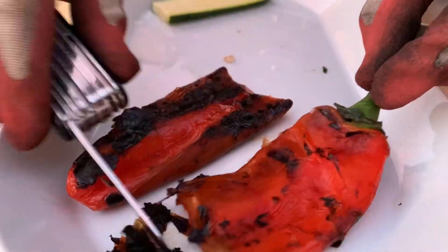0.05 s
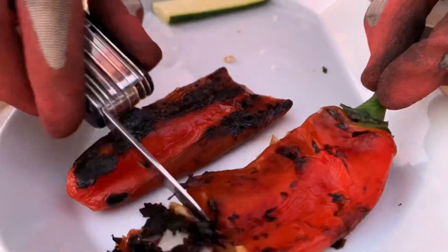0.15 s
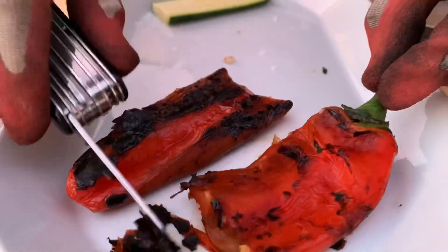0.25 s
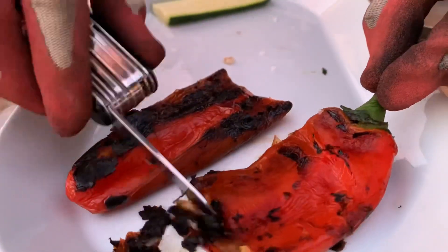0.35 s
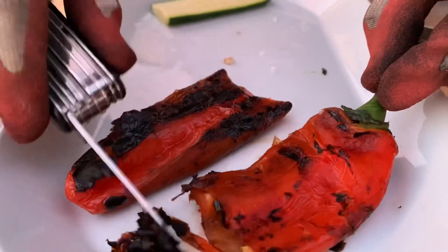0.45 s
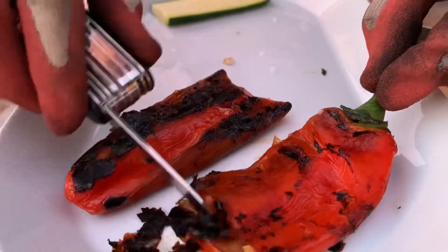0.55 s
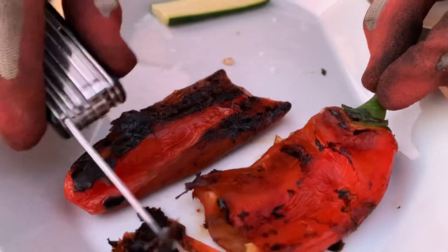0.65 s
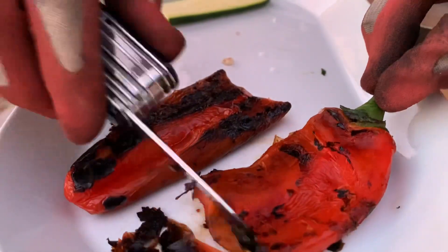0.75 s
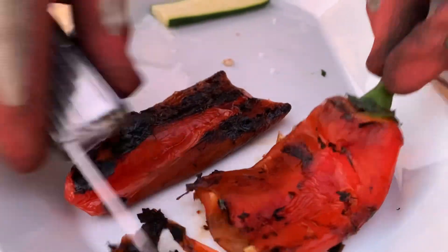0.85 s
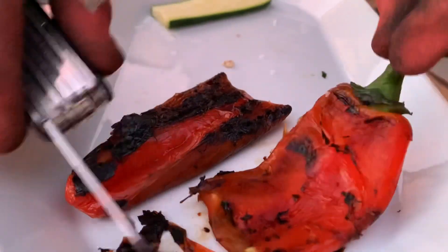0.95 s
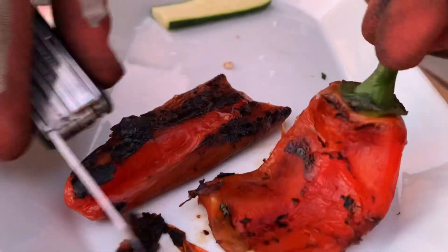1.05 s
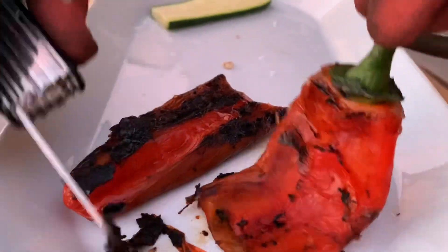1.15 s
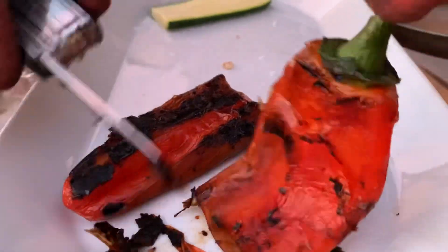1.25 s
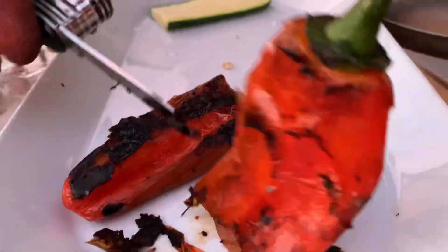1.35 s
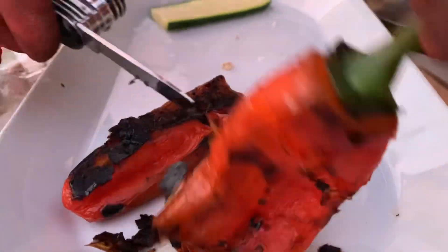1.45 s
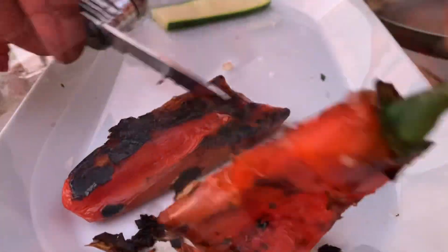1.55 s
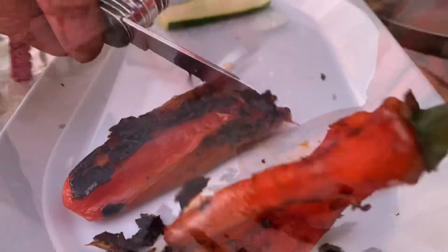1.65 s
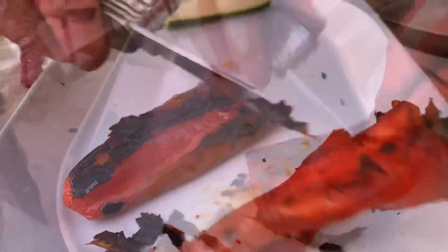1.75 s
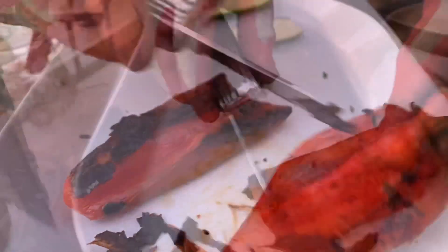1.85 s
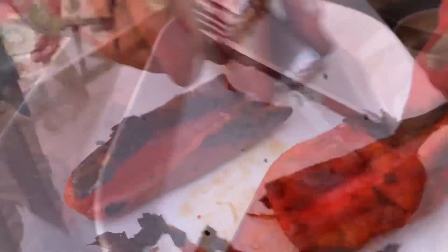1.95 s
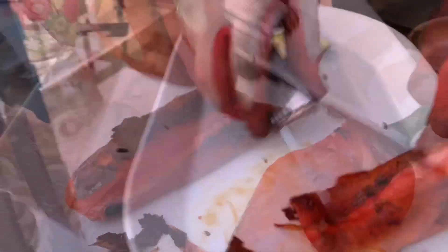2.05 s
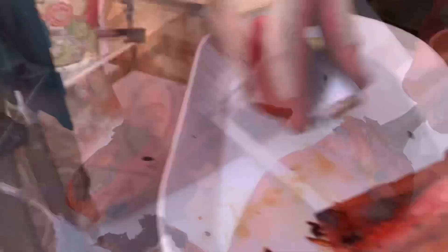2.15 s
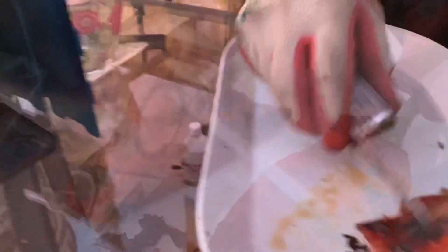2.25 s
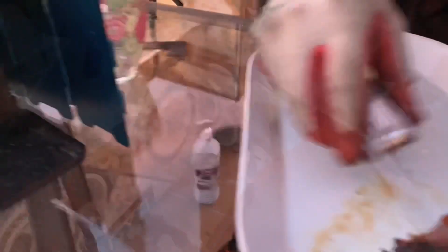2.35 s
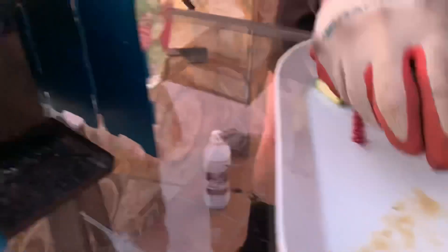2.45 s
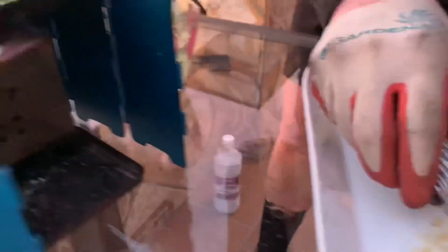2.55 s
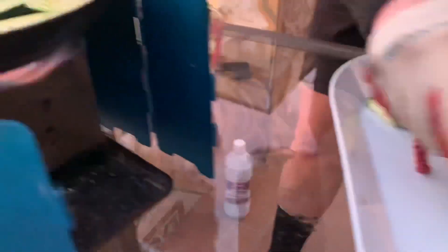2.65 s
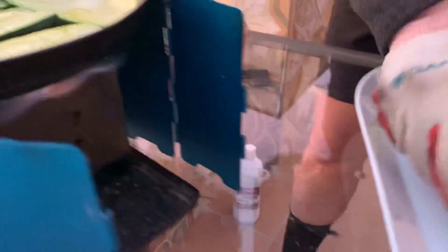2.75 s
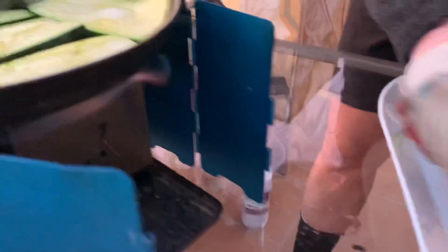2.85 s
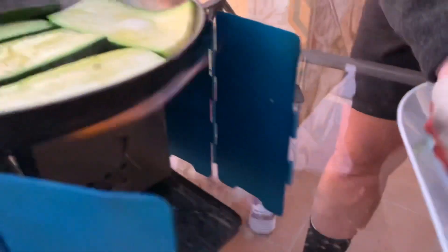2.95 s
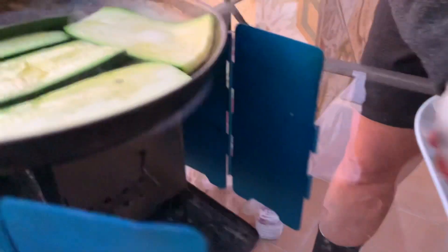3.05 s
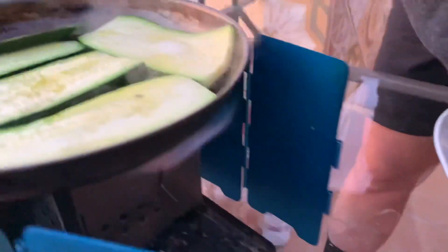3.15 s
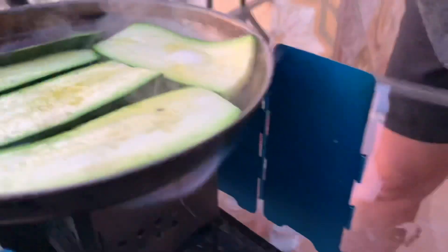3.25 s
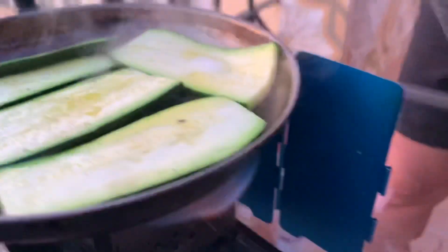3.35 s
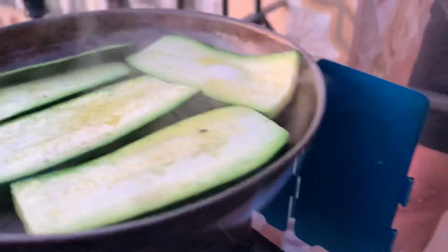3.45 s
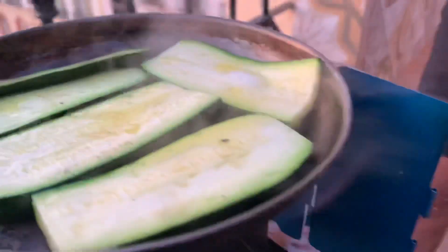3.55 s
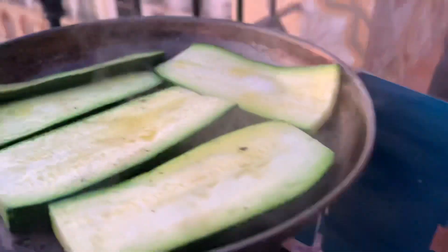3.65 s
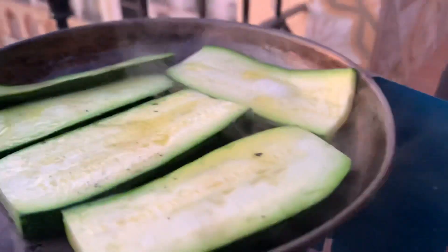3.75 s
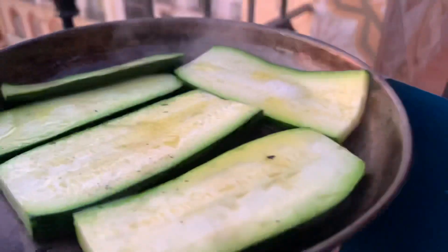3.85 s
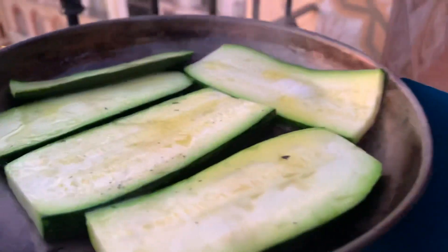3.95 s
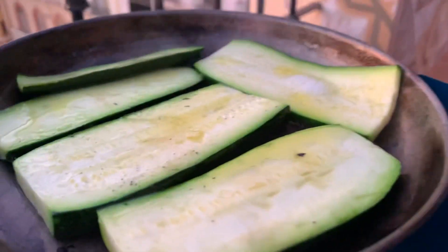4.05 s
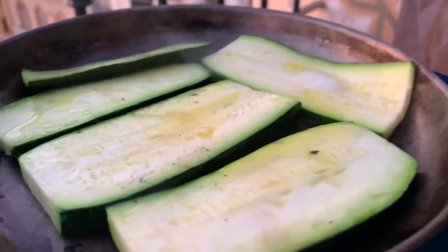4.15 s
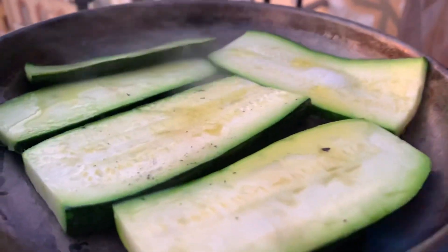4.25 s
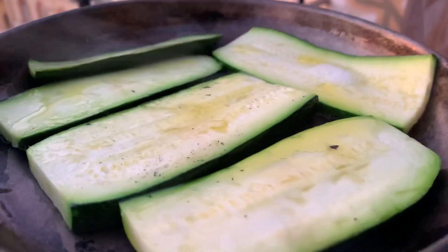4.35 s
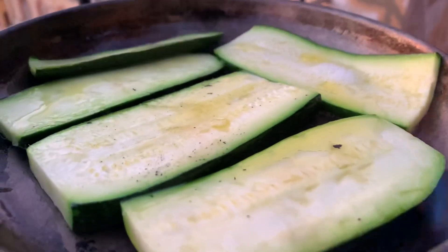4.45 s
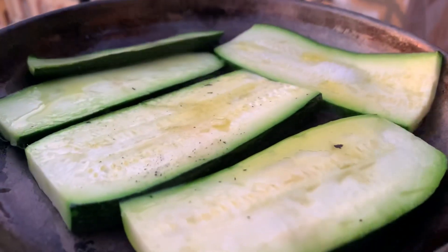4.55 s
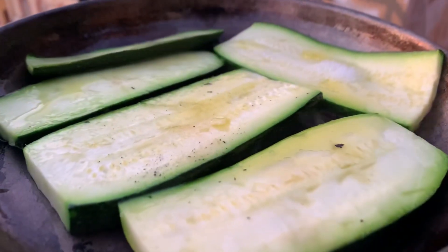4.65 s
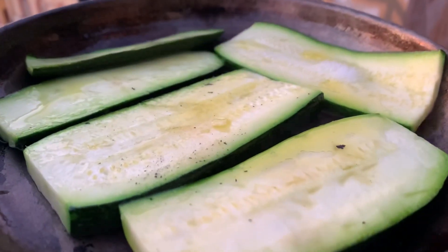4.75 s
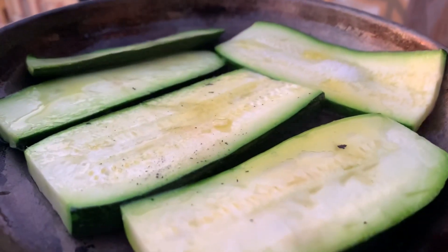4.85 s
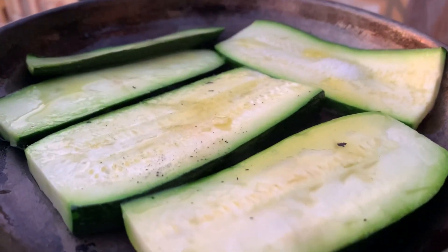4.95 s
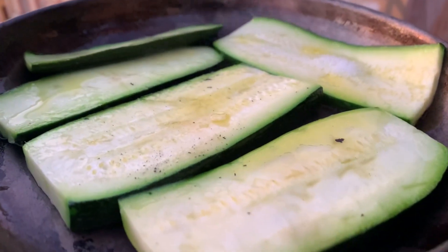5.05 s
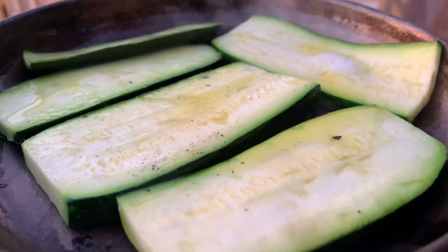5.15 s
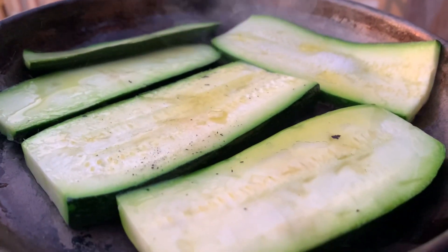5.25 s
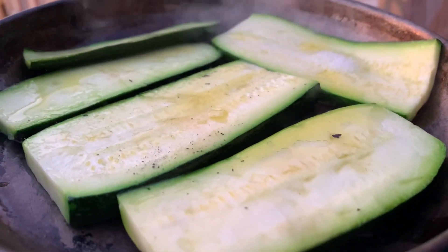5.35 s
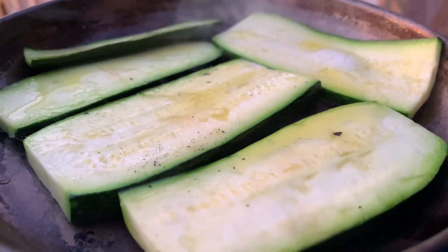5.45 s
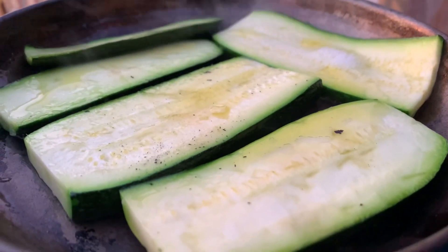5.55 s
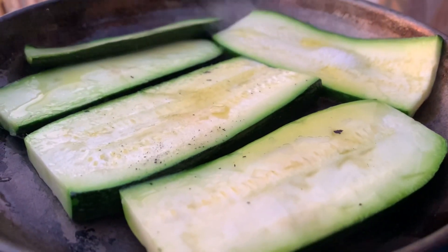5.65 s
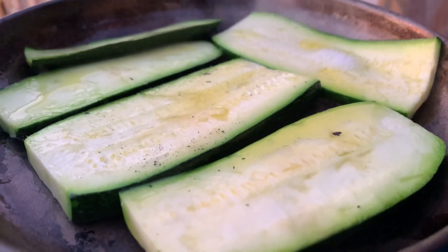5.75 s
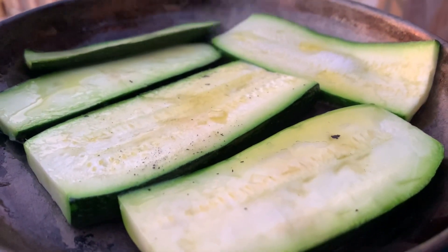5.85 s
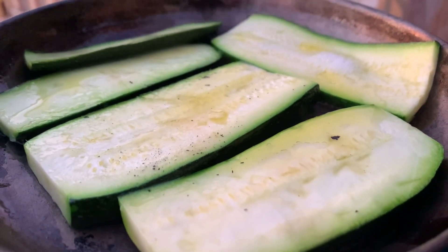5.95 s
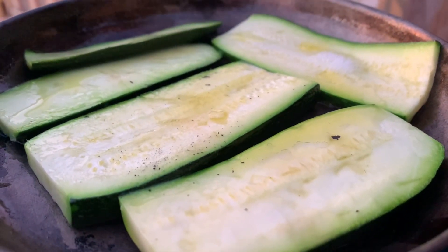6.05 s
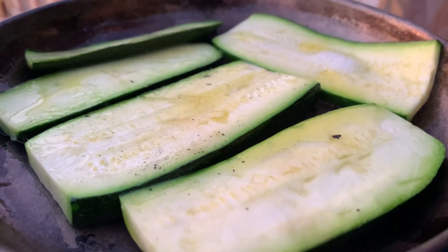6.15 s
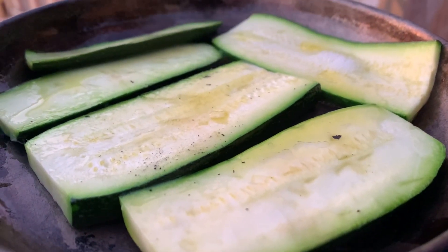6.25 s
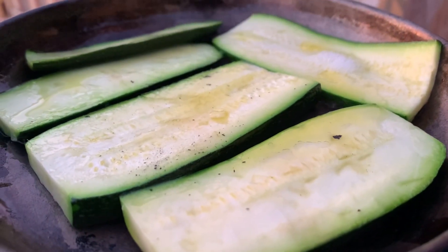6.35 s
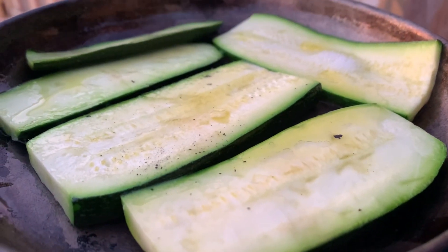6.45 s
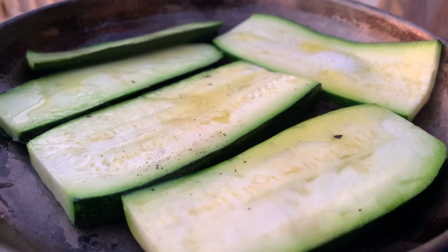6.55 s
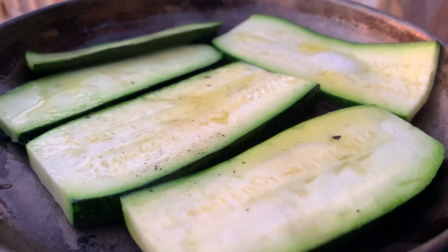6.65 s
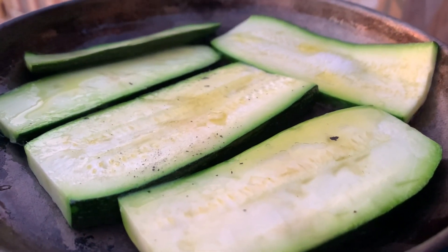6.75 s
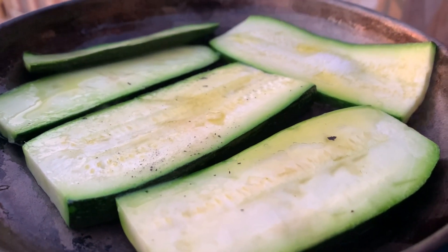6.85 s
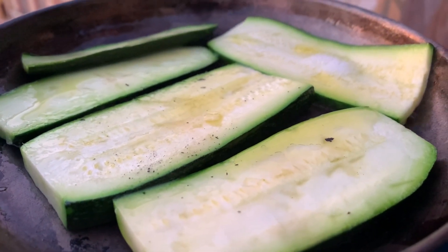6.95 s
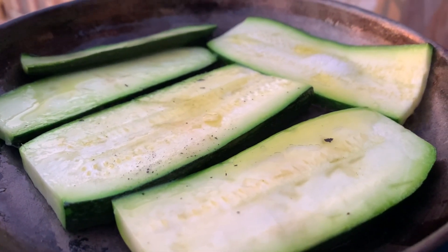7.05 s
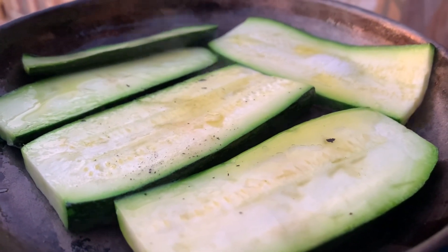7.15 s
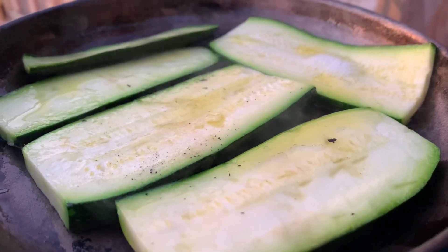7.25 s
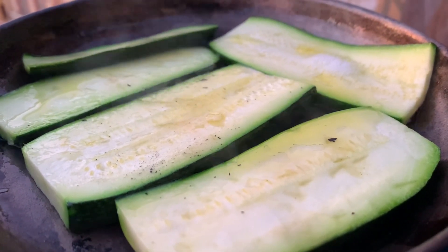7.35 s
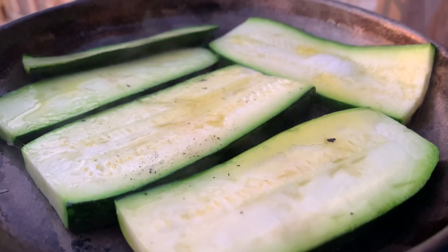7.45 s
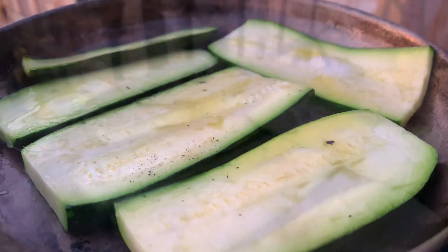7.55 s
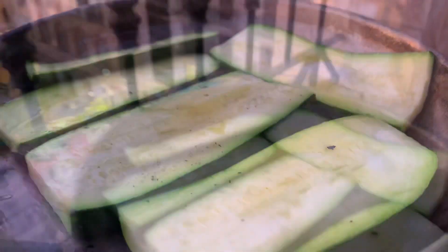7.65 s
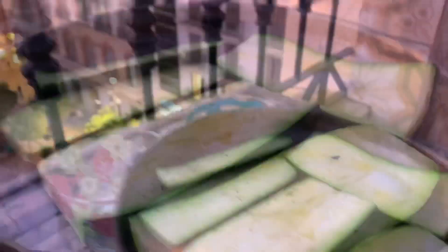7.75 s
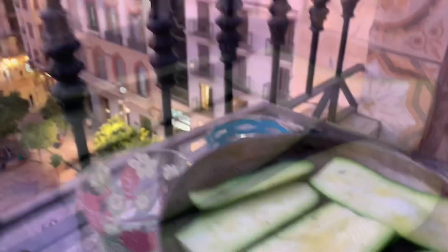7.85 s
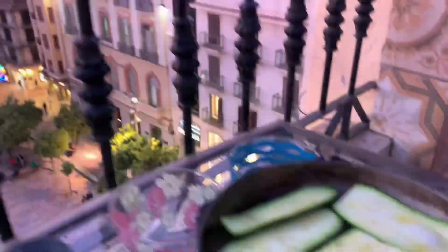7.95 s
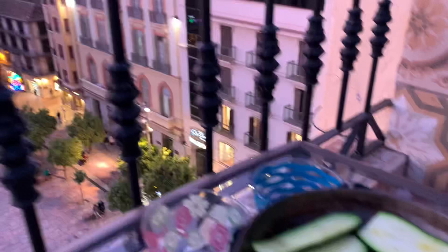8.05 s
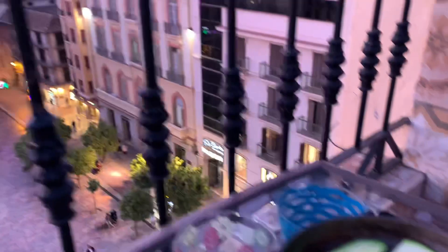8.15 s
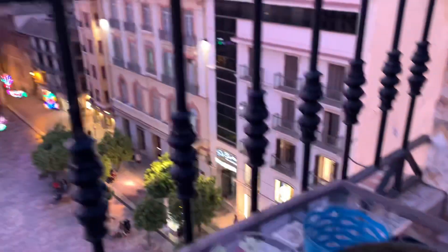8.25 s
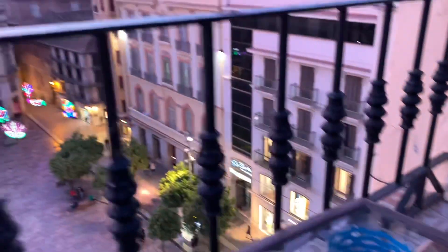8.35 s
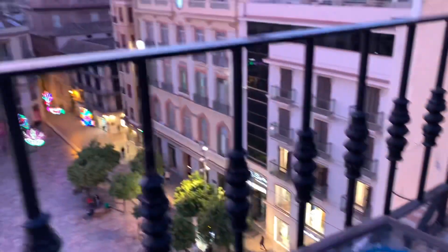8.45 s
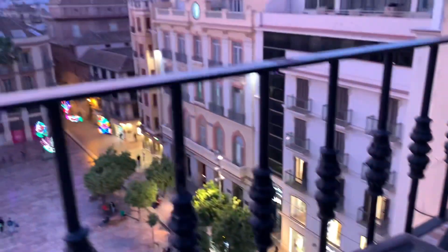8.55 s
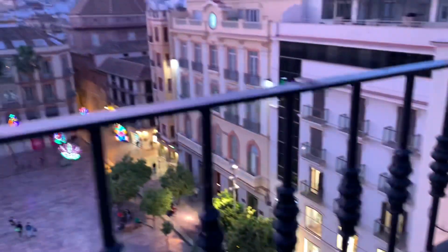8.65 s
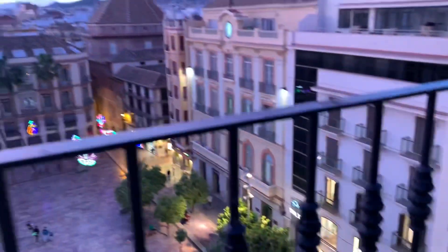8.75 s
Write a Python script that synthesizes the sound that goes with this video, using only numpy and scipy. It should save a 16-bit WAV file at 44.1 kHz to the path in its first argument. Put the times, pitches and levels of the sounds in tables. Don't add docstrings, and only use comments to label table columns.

```python
import sys
import numpy as np
from scipy import signal
from scipy.fft import rfft, irfft, next_fast_len
from scipy.io import wavfile
from scipy.ndimage import uniform_filter1d

SR = 44100
rng = np.random.default_rng(int(sys.argv[2]) if len(sys.argv) > 2 else 0)


def gain_from_decibels(decibels):
    exponent = np.asarray(decibels, float) / 20
    return 10 ** exponent


def unload_wav(signal):
    wavfile.write(
        sys.argv[1],
        SR,
        np.round(np.clip(np.atleast_2d(signal).T, -1, 1) * 32767).astype(np.int16),
    )


N = 388521

# time in seconds, lag of the right microphone in samples,
# spread of that lag over the pan in samples.
AIM = [
    (0, 21.5, 1.2),
    (2.3, 21, 1.4),
    (3, 16.5, 2.5),
    (7.5, 16.5, 2.5),
    (8.1, 3, 5),
    (8.81, -3, 4),
]


def evened(x):
    return x / np.sqrt(np.mean(x ** 2) + 1e-20)


def read(points, hz):
    f, value = np.transpose(points)
    return np.interp(np.log(hz + 1), np.log(f + 1), value)


def curve(table, count, t):
    return np.interp(t, np.array(table)[:, 0], np.array(table)[:, count])


def add(mix, s, sound):
    part = mix[max(round(s * SR), 0):][:len(sound)]
    part += sound[:len(part)]


def colour(x, points):
    size = next_fast_len(N)
    gain = gain_from_decibels(read(points, np.fft.rfftfreq(size, 1 / SR)))
    return irfft(rfft(x, size) * gain, size)[..., :N]


def wash(points, patchy_db, swell_db, sideways):
    # frequency in Hz, left-right likeness from 0 to 1.
    likeness = [(60, 0.91), (200, 0.95), (500, 0.75), (1000, 0.33)]
    frames, hz = N // 256 + 5, np.fft.rfftfreq(1024, 1 / SR)
    a, b, c, d, patches = rng.standard_normal((frames, 513, 5)).T
    swell = evened(uniform_filter1d(patches[0], 20))
    patches = evened(uniform_filter1d(uniform_filter1d(patches, 5, 0), 14, 1))
    same = np.clip(read(likeness, hz), 0, 1)[:, None]
    lag_s = sideways * curve(AIM, count=1, t=np.arange(frames) * 256 / SR) / SR
    left = a + 1j * b
    left_late = left * np.exp(-2j * np.pi * hz[:, None] * lag_s)
    z = np.array([left, same * left_late + np.sqrt(1 - same ** 2) * (c + 1j * d)])
    z *= gain_from_decibels(patchy_db * patches + swell_db * swell)
    noise = signal.istft(z, nperseg=1024, noverlap=768)[1][:, :N]
    return evened(colour(noise, points))


def street(t):
    # frequency in Hz, level in dB.
    hum = [(12, -48), (20, -90), (48, -0.5), (92, -1), (163, -1), (339, -8.5), (420, -5.5), (770, -15),
           (835, -21), (1000, -23.5), (1300, -65), (2200, -120)]
    # time in seconds, level in dB.
    traffic = [(0.0, -40.5), (0.17, -39), (0.39, -40), (1.57, -39.5), (2.03, -44.5), (2.26, -42.5),
               (2.43, -40.5), (3.88, -38), (4.49, -41), (5.18, -41), (5.4, -43.5), (5.89, -42),
               (6.33, -43.5), (7.41, -42), (7.88, -48), (8.0, -46), (8.19, -43), (8.81, -44)]
    balance = gain_from_decibels(np.array([[.3], [-.3]]))
    return gain_from_decibels(curve(traffic, count=1, t=t) + 1.5) * wash(hum, 2.6, 0.98, 0.67) * balance


def burner(t):
    # frequency in Hz, level in dB.
    roar = [(300, -15), (600, -11.5), (1000, -1), (1500, -4), (2200, -0.5), (3500, -11.5)]
    # time in seconds, level in dB.
    flame = [(0, -45.5), (1.5, -46), (2.1, -45.5), (2.45, -42), (2.9, -43.5), (4.9, -42.5), (5.25, -36),
             (5.5, -43.5), (7.4, -43), (7.8, -47), (8.1, -44), (8.81, -44.5)]
    balance = gain_from_decibels(np.array([[.7], [-.7]]))
    return gain_from_decibels(curve(flame, count=1, t=t)) * wash(roar, 2.1, 0.93, 0.7) * balance


def ring(modes, rise_s):
    t = np.arange(6000) / SR
    x = sum(gain_from_decibels(db - 60 * t / t60) * np.sin(2 * np.pi * (hz * t + rng.random())) for hz, db, t60 in modes)
    x = x * (1 - np.exp(-t / rise_s))
    return x / abs(x).max()


def burst(t60):
    t = np.arange(3000) / SR
    x = np.diff(rng.standard_normal(3001)) * gain_from_decibels(-60 * t / t60) * (1 - np.exp(-t / 0.00033))
    return x / abs(x).max()


def thud(hz, t60):
    t = np.arange(4000) / SR
    band = signal.butter(N=2, Wn=[hz / 3, hz], btype="band", fs=SR)
    x = signal.lfilter(*band, rng.standard_normal(4000))
    x = x * gain_from_decibels(-60 * t / t60) * (1 - np.exp(-t / 0.0024))
    return x / abs(x).max()


def knife():
    # frequency in Hz, level in dB, time to fall 60 dB in seconds.
    table_modes = [(126.4, 4, 0.09), (192, -5, 0.083), (244.6, 1, 0.057), (391, -3.5, 0.015),
                   (524, -25, 0.021)]
    plate_modes = [(1080, -6.5, 0.095), (1176, 0.5, 0.031), (566, -0.5, 0.059), (807, -5, 0.013),
                   (1600, -21, 0.0083)]
    blade_modes = [(4270, -10.5, 0.033), (4637, -12, 0.041), (4870, -8, 0.068), (6850, -13, 0.04),
                   (7330, -19, 0.039), (2245, -13, 0.037)]
    # time in seconds, table thump in dB, plate in dB, edge tick in dB.
    plate_taps = [
        (0.044, -29, -30.5, -55),
        (0.219, -22, -40, -28),
        (0.231, -43, -33, -50),
        (0.429, -18, -31.5, -26.5),
        (0.614, -22, -32.5, -39),
        (0.825, -15, -30.5, -20),
        (0.926, -22, -30.5, -57),
    ]
    # time in seconds, table thump, blade and edge tick in dB, blade ring in Hz.
    cuts = [(3.006, -19, -22.5, -35, 1924), (3.234, -22.5, -17.5, -30, 2450),
            (3.466, -19.5, -37, -40, 2270), (3.669, -19.5, -25, -29, 2690), (3.898, -21.5, -19, -26, 2730),
            (4.138, -34, -25, -27, 2940), (5.429, -19.5, -23.5, -23, 2570), (5.625, -25.5, -28, -40, 2900),
            (5.852, -20.5, -26, -24.5, 2640), (6.045, -22.5, -20, -40, 2650),
            (6.257, -18, -22, -24.5, 2650), (6.501, -22.5, -28, -41, 2970),
            (6.736, -21.5, -27.5, -26, 2680), (6.993, -15.5, -20, -42, 1990),
            (7.159, -24.5, -41, -33, 2740), (7.427, -15, -21, -24.5, 2860), (7.708, -32, -34, -31, 2780)]
    out = np.zeros(N)
    taps = [(s, thump, plate, edge - 3, edge, 7340) for s, thump, plate, edge in plate_taps]
    taps += [(s, thump, thump - 25.5, blade, edge, hz) for s, thump, blade, edge, hz in cuts]
    for s, thump_db, plate_db, blade_db, tick_db, blade_hz in taps:
        spot = [(hz * rng.uniform(.88, 1.12), db + rng.uniform(-4, 4), t60) for hz, db, t60 in table_modes]
        add(out, s + 0.00561, gain_from_decibels(thump_db - 1.0) * ring(spot, 0.0014))
        add(out, s, gain_from_decibels(plate_db + 7.0) * ring(plate_modes, 0.0014))
        add(out, s, gain_from_decibels(plate_db + 1.5) * thud(1100, 0.084))
        add(out, s, gain_from_decibels(blade_db + 5.5) * ring(list(blade_modes) + [(blade_hz, -4.5, .05)], 0.0003))
        add(out, s, gain_from_decibels(tick_db + 17.5) * burst(0.035))
        add(out, s + 0.014, gain_from_decibels(tick_db) * burst(0.014))
    return out


def knife_pair(taps):
    t = np.arange(N) / SR
    return np.array([taps, np.where(t > 2, np.roll(taps, -8), np.roll(taps, 2))])


def pair(x, place, wander):
    hz, t, z = signal.stft(x, SR, nperseg=512)
    place = place + wander * evened(uniform_filter1d(rng.standard_normal(len(t)), 12))
    lag = curve(AIM, count=1, t=t) + place * curve(AIM, count=2, t=t)
    late = signal.istft(z * np.exp(-2j * np.pi * hz[:, None] * lag / SR), SR, nperseg=512)[1][:N]
    return np.array([x, late])


def sizzle(t):
    # time in seconds, level in dB.
    boil = [(0.0, -47.5), (0.37, -49), (1.25, -43), (2.3, -46), (2.53, -41.5), (2.67, -38), (2.97, -33.5),
            (3.46, -33), (4.02, -26.5), (4.51, -29), (4.86, -29), (5.32, -21), (5.81, -28), (6.45, -28.5),
            (6.87, -27.5), (7.46, -27.5), (8.46, -38), (8.81, -41)]
    return curve(boil, count=1, t=t) + 40


def bubbles(points, low_hz, high_hz, per_s, spread_db, clump_db, hiss, grain_s, diffuse):
    out = np.zeros((2, N))
    clumps = evened(uniform_filter1d(uniform_filter1d(rng.standard_normal(N), size=1300), size=1300))
    places = rng.permutation(np.linspace(-1.5, 1.5, num=6))
    for place, hz in zip(places, np.geomspace(low_hz, high_hz, num=6)):
        size = gain_from_decibels(spread_db * np.minimum(rng.exponential(1, N), 3.5) + clump_db * clumps)
        size *= rng.random(N) < per_s / SR
        flare = signal.lfilter([1], [1, -np.exp(-1 / (grain_s * SR))], size)
        puffs = evened(flare * rng.standard_normal(N)) + hiss * rng.standard_normal(N)
        band = [(hz / 1.6, -18), (hz / 1.15, 0), (hz * 1.15, 0), (hz * 1.6, -18)]
        out += pair(colour(puffs, band), .6 * place, .9)
    out = evened(out) + diffuse * rng.standard_normal((2, N))
    return evened(colour(out, points))


def fizz(t):
    # frequency in Hz, level in dB.
    fizz_tone = [(3000, -11), (6000, -1.5), (8000, 6), (10000, 5.5), (13000, 5.5), (15500, 6.5),
                 (17000, -14)]
    crowd = bubbles(fizz_tone, 6500, 16000, per_s=480, spread_db=4.7, clump_db=2.9, hiss=.8,
                    grain_s=0.00025, diffuse=0.21)
    return gain_from_decibels(-36 + 0.82 * sizzle(t)) * crowd


def sputter(t):
    # frequency in Hz, level in dB.
    sputter_tone = [(1200, -10), (2000, -11.5), (2700, -1), (3300, 4), (4200, -1), (5500, -1), (7000, 2.5),
                    (8500, -114), (11000, 7)]
    crowd = bubbles(sputter_tone, 2000, 7500, per_s=300, spread_db=4.5, clump_db=3.25, hiss=0.6,
                    grain_s=0.00054, diffuse=0.73)
    return gain_from_decibels(-36 + 0.57 * sizzle(t)) * crowd


def snap(hz, cycles, echo_db):
    turns = (np.arange(400) - 40) * hz / SR
    glide, phase, wall = rng.random(3)
    shape = np.exp(-abs(turns) / np.where(turns < 0, .45, cycles))
    x = shape * np.cos(2 * np.pi * (turns + 0.086 * (glide - .5) * turns ** 2 + .3 * phase))
    return x + gain_from_decibels(echo_db) * np.roll(x, 90 + int(70 * wall))


def strays(count, db):
    when, loud, size = rng.random((count, 3)).T
    s = when * N / SR
    return s, db + sizzle(s) - 2.2 * np.log(loud + 0.28), size


def pops():
    # time
    # in seconds, peak in dB, ring in Hz.
    far_pops = [(0.7597, -21, 6100), (1.071, -25, 4100), (1.0929, -22, 6100), (1.2436, -33, 6430),
                (1.2615, -26, 4370), (1.3194, -33, 6230), (1.3344, -24.5, 3860), (1.3588, -22, 6150),
                (1.4431, -30, 6290), (1.4656, -25, 3650), (1.5085, -26, 6250), (1.7744, -23, 6250),
                (1.8632, -28, 3810), (2.0916, -27.5, 4200), (2.3047, -23.5, 4530), (2.4892, -34, 4800),
                (2.6958, -24, 6060)]
    near_pops = [(3.0065, -15, 4830), (3.137, -27, 3040), (3.1975, -15.5, 6060), (3.2357, -12, 4840),
                 (3.3547, -26, 6270), (3.4569, -26, 5790), (3.6699, -15, 6470), (3.7266, -11, 6410),
                 (3.7797, -19, 6320), (3.8745, -8, 6100), (3.9008, -7.5, 5160), (3.9772, -9, 6470),
                 (4.0511, -16, 6350), (4.1094, -22, 2330), (4.2206, -15.5, 6000), (4.2977, -18, 3000),
                 (4.3848, -22, 6490), (4.4002, -14.5, 6400), (4.4548, -20, 3120), (4.4771, -26, 3040),
                 (4.529, -22, 3750), (4.574, -15, 6340), (4.631, -21, 5870), (4.9268, -15, 2560),
                 (5.0214, -24, 3150), (5.0423, -30, 6390), (5.151, -7.5, 6300), (5.3054, -16.5, 3350),
                 (5.4279, -20, 4940), (5.4737, -20.5, 6410), (5.5661, -19, 4880), (5.6453, -20, 3370),
                 (5.6673, -17, 3200), (5.7883, -21, 2900), (5.8425, -19, 6190), (5.921, -19, 3000),
                 (6.049, -13, 4330), (6.1306, -16, 5740), (6.201, -20, 3210), (6.254, -26, 6420),
                 (6.254, -10.5, 4330), (6.4955, -29, 4930), (6.5217, -18, 3520), (6.572, -24, 3270),
                 (6.695, -20, 3200), (6.731, -22, 4870), (6.7755, -14, 5280), (6.8747, -15, 6300),
                 (6.909, -23, 4630), (6.9925, -15, 4940), (7.1152, -15, 3180), (7.1795, -8.5, 6430),
                 (7.364, -20, 3060), (7.4251, -4.5, 4860), (7.54, -18, 6450), (7.6773, -20, 5000),
                 (7.7916, -22.5, 2920), (8.3016, -17.5, 2820), (8.654, -22, 4300), (8.7186, -17, 5700)]
    # time in seconds, peak in dB.
    snaps = [(3.3543, -14), (3.4062, -10.5), (3.5913, -17), (3.6676, -8), (3.8727, -6), (3.9769, -9),
             (4.0513, -19), (4.2189, -4.5), (4.2733, -12), (4.3007, -10), (4.4204, -13), (4.4768, -11.5),
             (5.1188, -12), (5.1513, -8.5), (5.4725, -22), (5.7464, -17), (5.8347, -4.5), (5.9839, -15),
             (6.5211, -10), (6.7756, -16), (6.8384, -6.5), (6.8704, -10), (7.0484, -20), (7.1796, -16),
             (7.4131, -16), (7.4246, -19), (7.9299, -11), (8.0631, -10.5), (8.3006, -10.5), (8.4168, -23)]
    spits = [(2.8297, -18), (2.9366, -11), (3.0063, -17), (3.1377, -14), (3.2346, -11.5), (3.3257, -12.5),
             (3.5323, -24), (3.5912, -10), (3.668, -17), (3.8081, 0.5), (3.873, -15), (3.9738, -11),
             (4.3015, -17), (4.3848, -25), (4.4298, -8), (4.5739, -10), (4.6233, -10), (4.7789, -9),
             (4.997, -22), (5.0588, -14), (5.0817, -13), (5.3446, -17), (5.6698, -13), (5.747, -10),
             (5.8686, -8), (5.9833, -9), (6.2077, -11.5), (6.2536, -26), (6.2536, -22), (6.3444, -19),
             (6.3668, -8), (6.5469, -8.5), (6.6172, -23), (6.6944, -12), (6.7675, -10), (6.8008, -10),
             (6.8063, -9), (6.9776, -24), (6.9873, -16), (7.0483, -14.5), (7.0872, -13), (7.1176, -15),
             (7.4242, -18), (7.4738, -16), (7.4943, -8.5), (7.89, -18), (7.929, -17), (8.1164, -16),
             (8.1546, -15), (8.286, -23), (8.507, -27), (8.5852, -16), (8.716, -14)]
    # time in seconds, peak in dB, centre in Hz.
    needles = [(0.2179, -17, 4360), (0.4269, -13.5, 4400), (0.8255, -8, 4400), (2.9367, -30, 4400),
               (3.5917, -16, 4400), (4.2976, -5, 4400), (4.4298, -9.5, 4380), (4.4772, -13, 4400),
               (4.574, -18, 4400), (4.779, -18, 4400), (5.0589, -24, 4400), (5.3448, -16, 4400),
               (6.2537, -12, 4400), (6.8744, -10, 4370), (7.1152, -4.5, 4440), (7.4245, -7, 4400),
               (7.4939, -15, 4400)]
    # time in seconds, level
    # in dB, ring in Hz.
    plops = [(3.236, -32.5, 1810), (3.467, -31.5, 1080), (3.468, -30.5, 1690), (4.176, -34, 1490),
             (4.424, -34.5, 980), (4.532, -36, 1080), (5.17, -35.5, 680), (5.202, -37, 880),
             (5.254, -48, 945), (5.306, -36.5, 1040), (5.669, -31.5, 1270), (6.249, -42, 848),
             (6.877, -29.5, 1230), (6.992, -41, 880), (7.423, -31.5, 1650), (7.908, -44.5, 1160),
             (8.002, -45, 1030), (8.302, -52, 1340)]
    out, early, burst_lag = np.zeros(N), 40 / SR, .0013
    s, db, size = strays(count=70, db=-37)
    stray_pops = list(zip(s, db, 3200 * (8000 / 3200) ** size))
    stray_spits = list(zip(*strays(count=120, db=-31)[:2]))
    tight = [(s, db, 7730) for s, db in snaps]
    for s, db, hz in list(far_pops) + list(near_pops) + tight + stray_pops:
        s, db = s + burst_lag, db + 3.5
        add(out, s - early, gain_from_decibels(db) * snap(hz, rng.uniform(0.97, 1.9), -4.5))
        add(out, s, gain_from_decibels(db - 19.0) * thud(1.5 * hz, 0.035))
        add(out, s - early, gain_from_decibels(db - 6.5) * snap(hz * rng.choice([.55, 1.7]), 0.39, -18.5))
    for s, db in list(spits) + stray_spits:
        s, db = s + burst_lag, db + 7.5
        add(out, s - early, gain_from_decibels(db) * snap(rng.uniform(8300, 11100), rng.uniform(0.52, 1.4), -21.0))
        add(out, s - early, gain_from_decibels(db - 2.5) * snap(rng.uniform(14000, 14200), rng.uniform(1.0, 1.6), -20))
        add(out, s, gain_from_decibels(db - 16.5) * burst(0.023))
    for s, db, hz in needles:
        add(out, s + burst_lag - early, gain_from_decibels(db + 1.5) * snap(hz, 0.41, -12))
    for s, db, hz in plops:
        add(out, s + 0.00102, gain_from_decibels(db + 16.0) * snap(hz, 0.61, -6))
    return out


def terrace(x):
    t = np.arange(3000) / SR
    sparse = rng.standard_normal((2, 3000)) * (rng.random((2, 3000)) < .06)
    tail = sparse * gain_from_decibels(-60 * t / 0.079) * (t > .001)
    tail /= np.linalg.norm(tail, axis=1, keepdims=True)
    return colour(signal.oaconvolve(x[None], tail, axes=1)[:, :N], [(300, -30), (1200, 0)])


def scene():
    t = np.arange(N) / SR
    background = street(t) + burner(t)
    frying = fizz(t) + sputter(t)
    taps, bursts = knife(), pops()
    echoes = gain_from_decibels(-8.5) * terrace(taps + bursts)
    return background + frying + knife_pair(taps) + pair(bursts, 0, 0.57) + echoes


def roll_off(x):
    return signal.sosfilt(signal.butter(12, 16500, fs=SR, output="sos"), x)


def record(dry):
    size = next_fast_len(N)
    hz, (left, right) = np.fft.rfftfreq(size, 1 / SR), rfft(dry, size)
    top = np.clip((hz - 7300) / 900 + .5, 0, 1) * .82
    spread = left * np.exp(2j * np.pi * (hz * 14 / SR - 1 / 4))
    right = np.sqrt(top) * spread + np.sqrt(1 - top) * right
    clipped = np.clip(irfft(np.array([left, right]), size)[:, :N], -1, 1)
    limited = colour(clipped, [(16350, 0), (16600, -60)])
    return roll_off(limited)


dry = scene()
out = record(dry)
unload_wav(out)
```